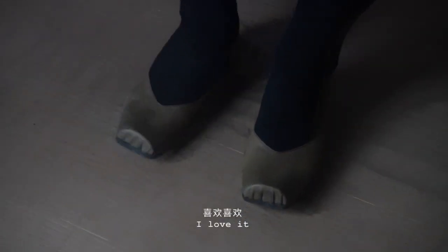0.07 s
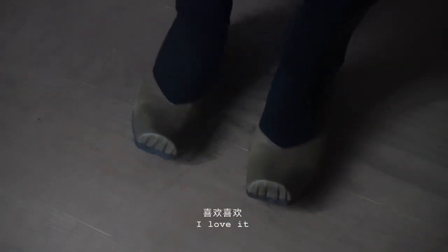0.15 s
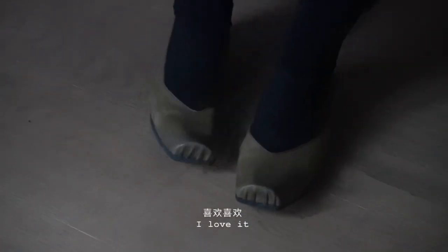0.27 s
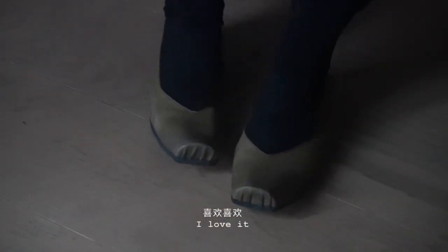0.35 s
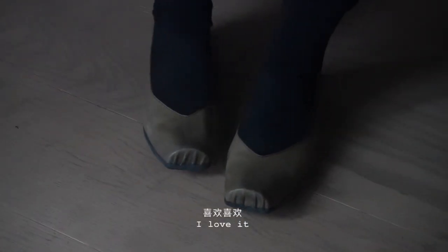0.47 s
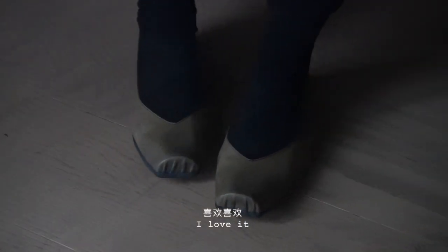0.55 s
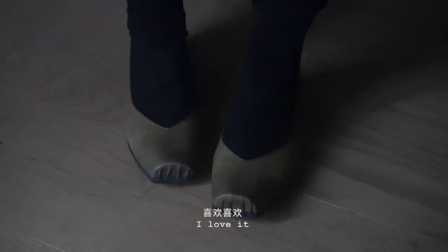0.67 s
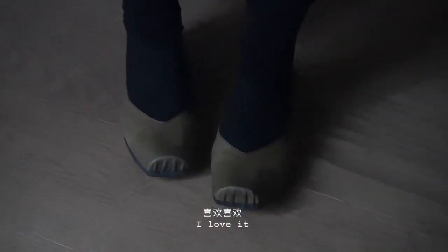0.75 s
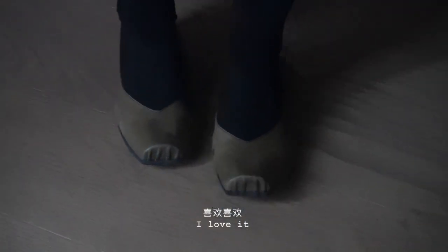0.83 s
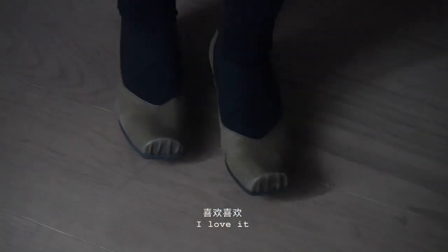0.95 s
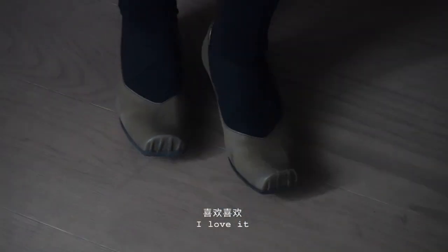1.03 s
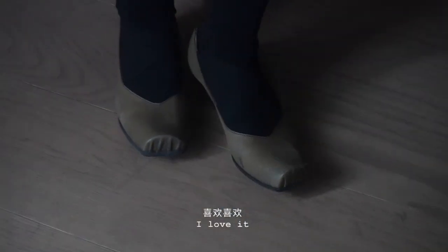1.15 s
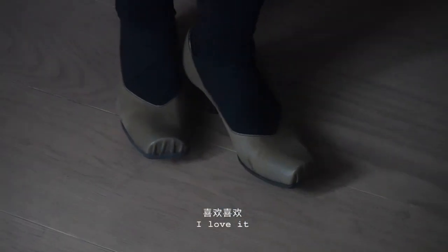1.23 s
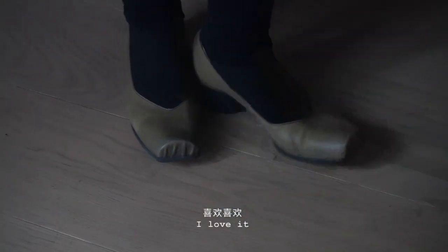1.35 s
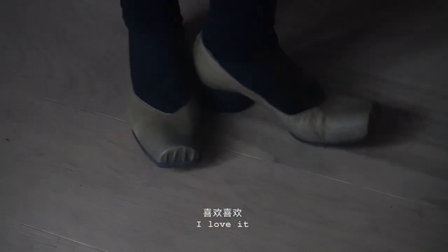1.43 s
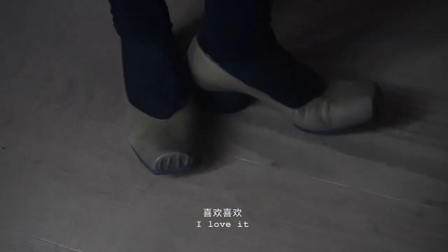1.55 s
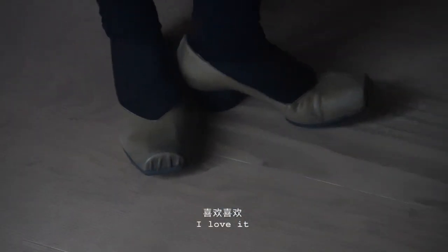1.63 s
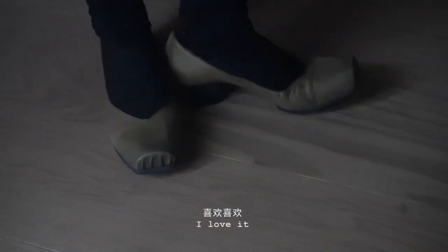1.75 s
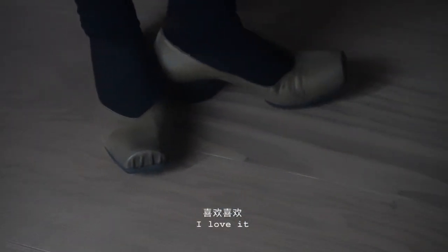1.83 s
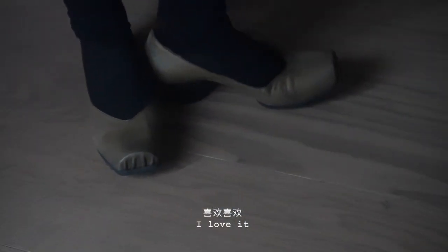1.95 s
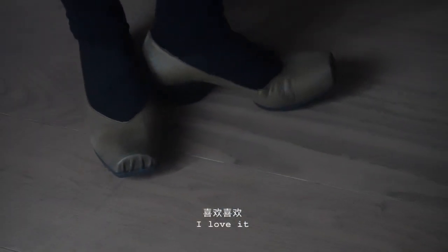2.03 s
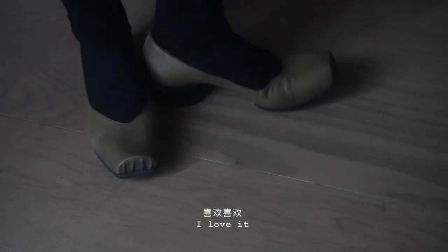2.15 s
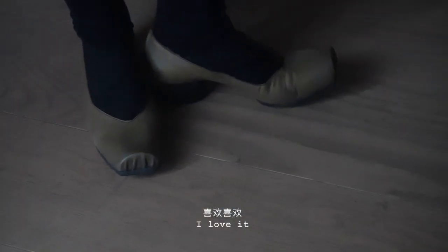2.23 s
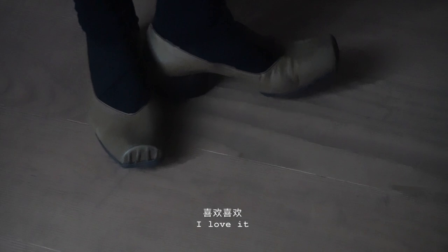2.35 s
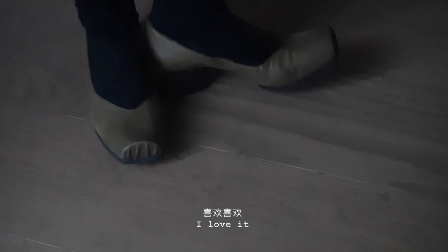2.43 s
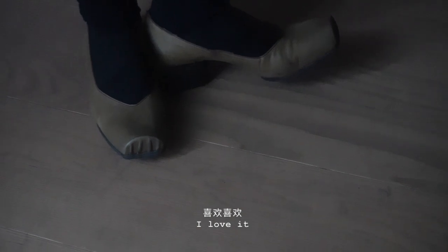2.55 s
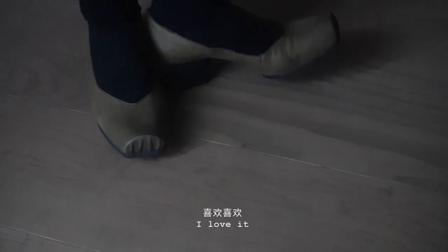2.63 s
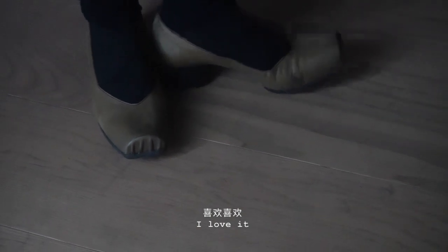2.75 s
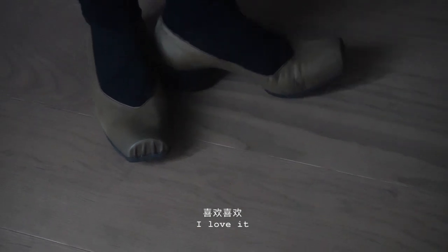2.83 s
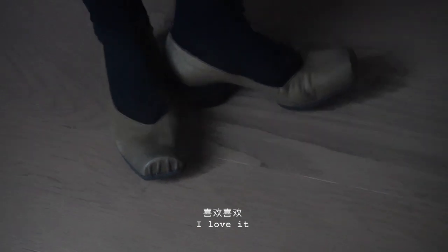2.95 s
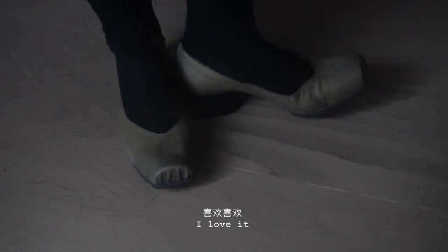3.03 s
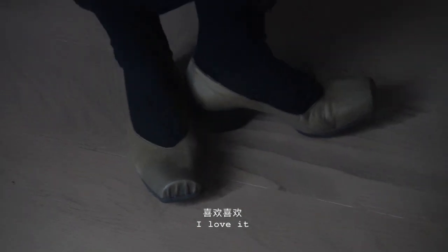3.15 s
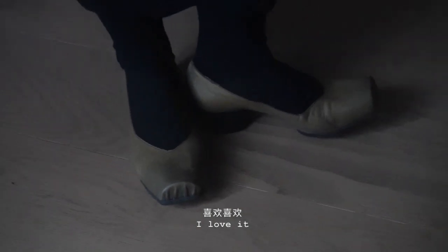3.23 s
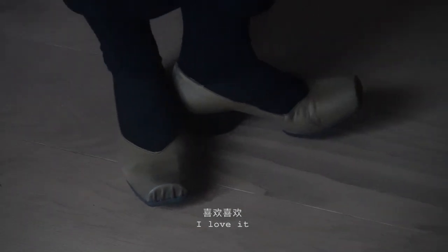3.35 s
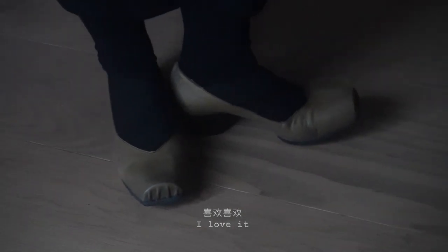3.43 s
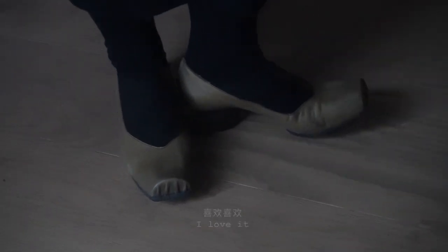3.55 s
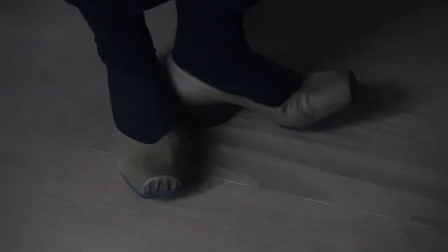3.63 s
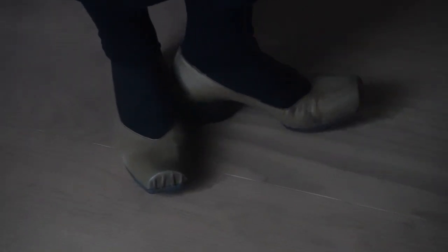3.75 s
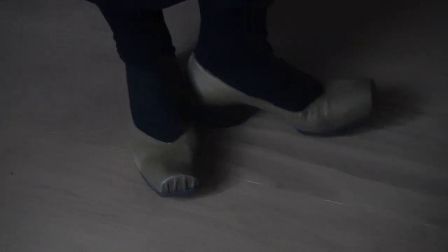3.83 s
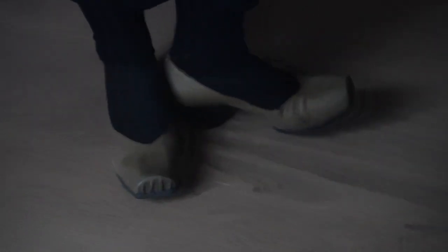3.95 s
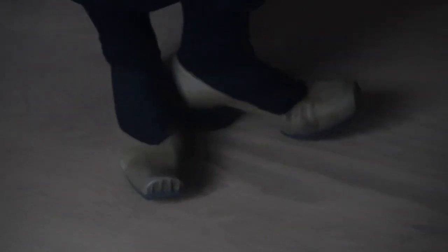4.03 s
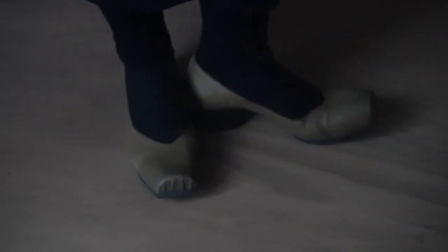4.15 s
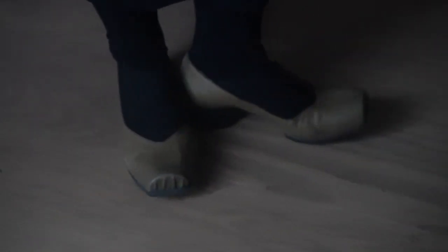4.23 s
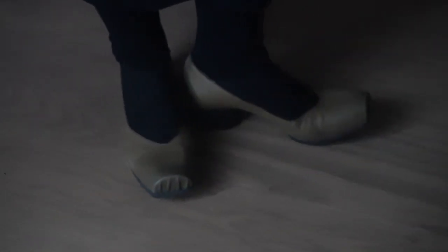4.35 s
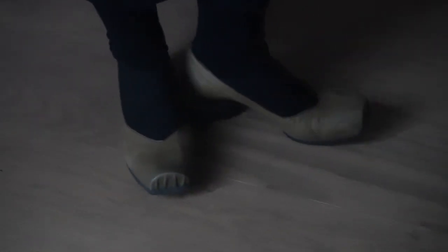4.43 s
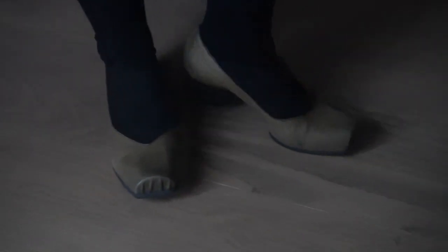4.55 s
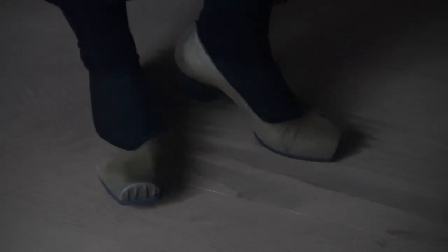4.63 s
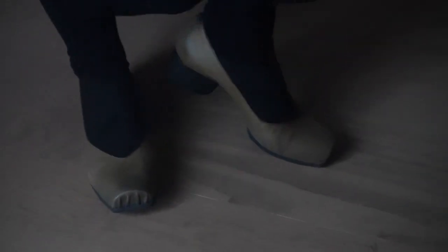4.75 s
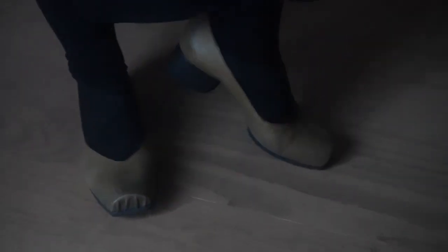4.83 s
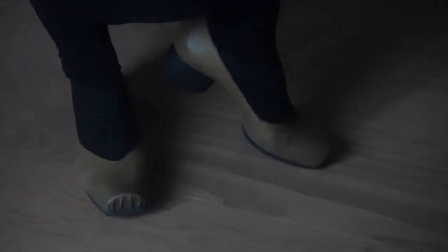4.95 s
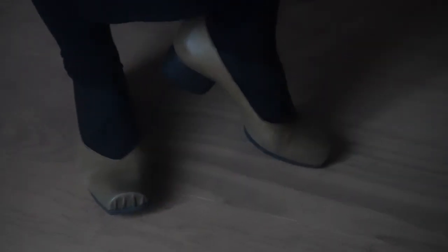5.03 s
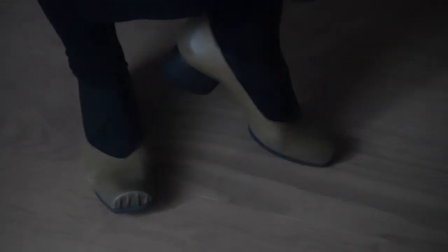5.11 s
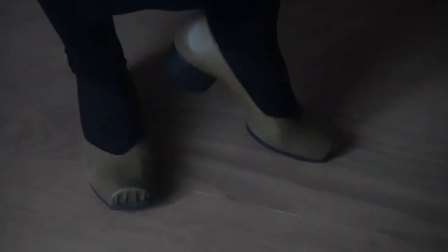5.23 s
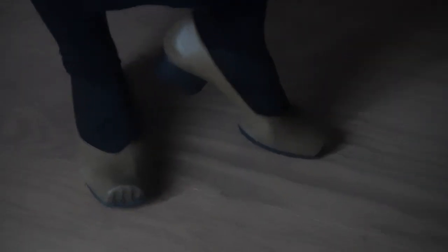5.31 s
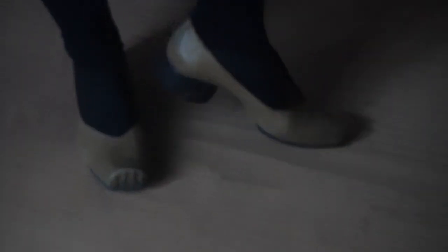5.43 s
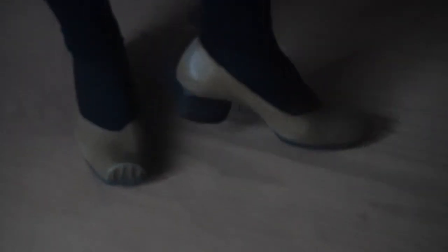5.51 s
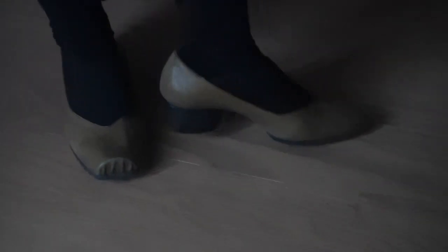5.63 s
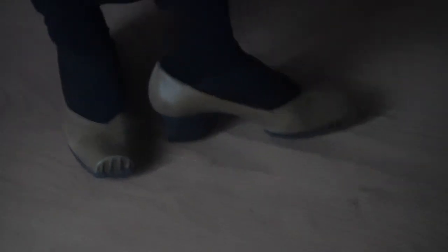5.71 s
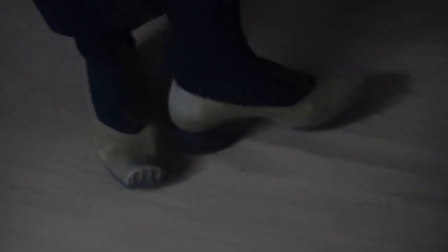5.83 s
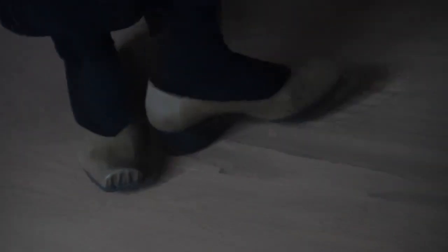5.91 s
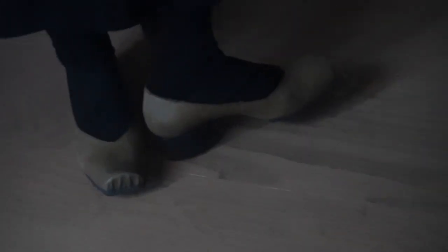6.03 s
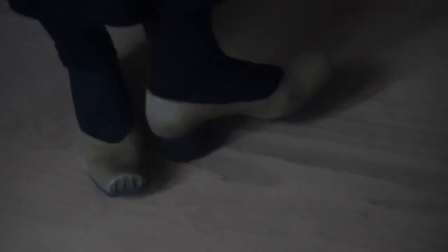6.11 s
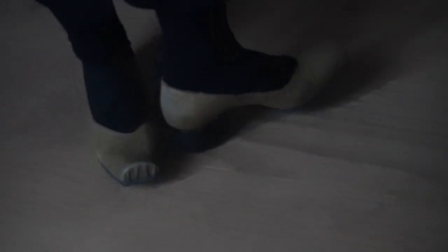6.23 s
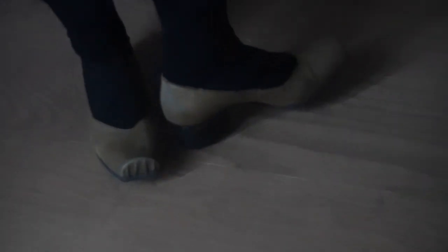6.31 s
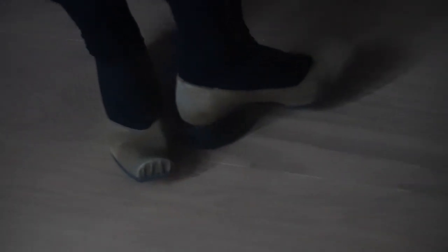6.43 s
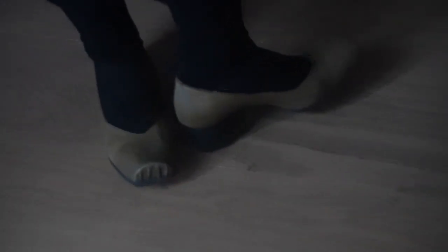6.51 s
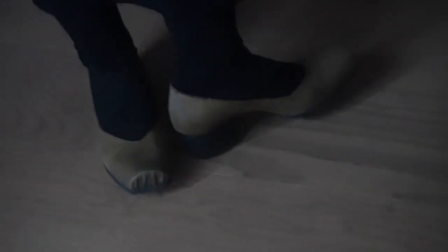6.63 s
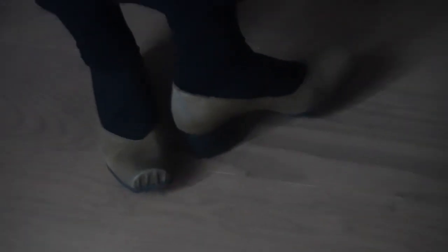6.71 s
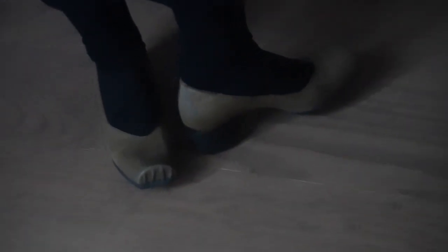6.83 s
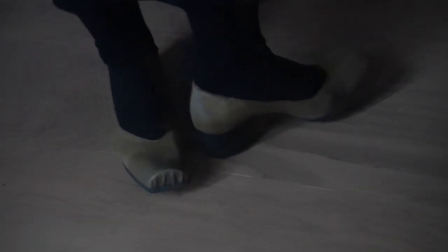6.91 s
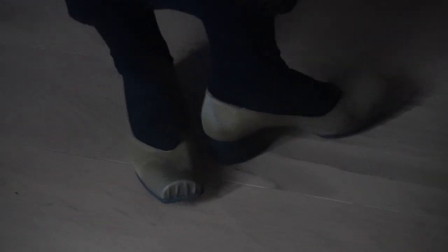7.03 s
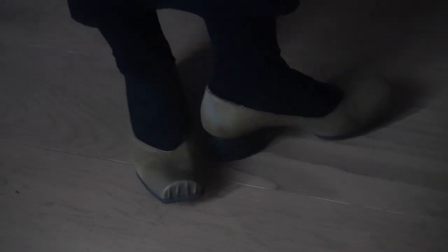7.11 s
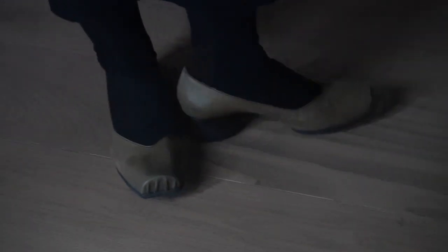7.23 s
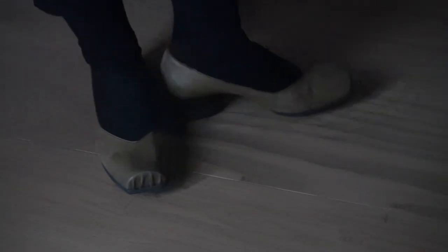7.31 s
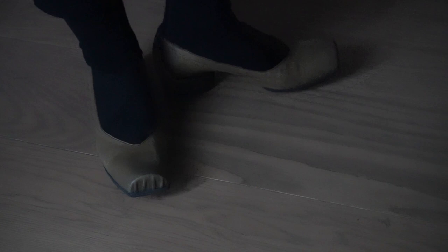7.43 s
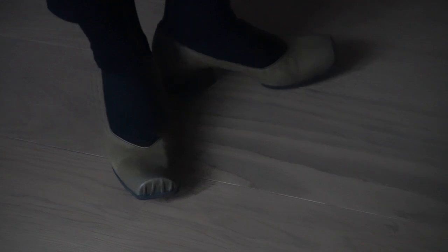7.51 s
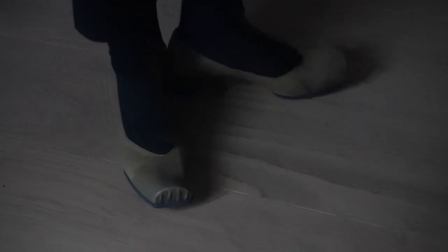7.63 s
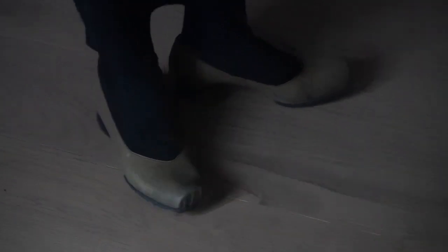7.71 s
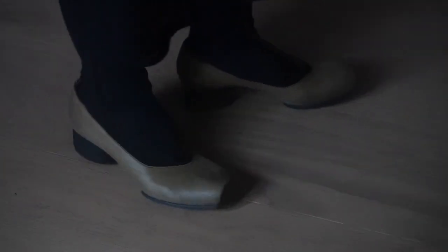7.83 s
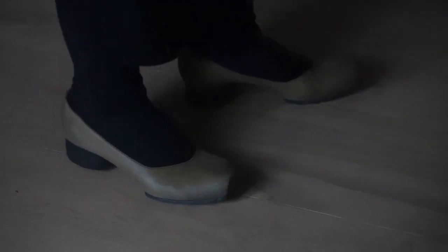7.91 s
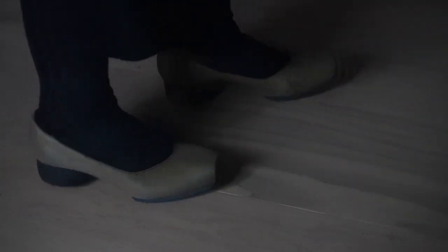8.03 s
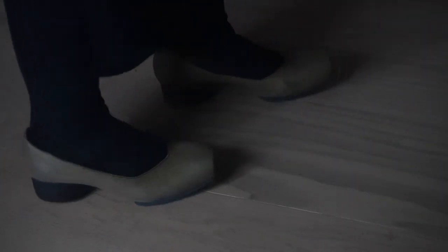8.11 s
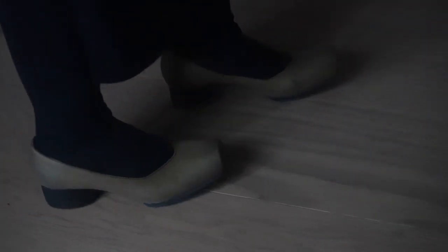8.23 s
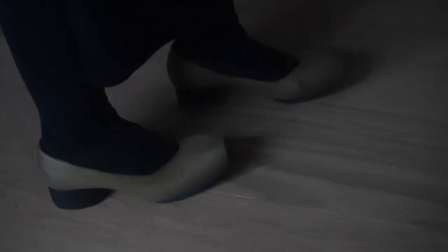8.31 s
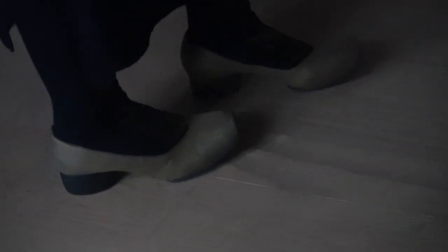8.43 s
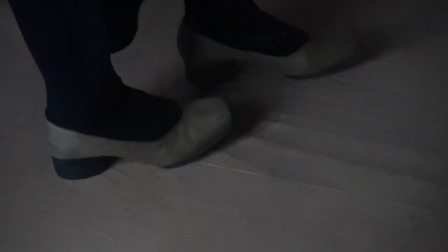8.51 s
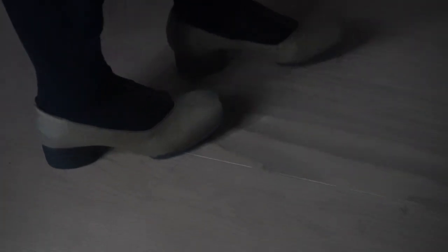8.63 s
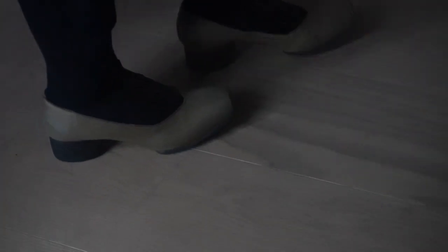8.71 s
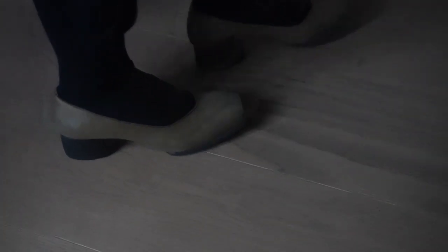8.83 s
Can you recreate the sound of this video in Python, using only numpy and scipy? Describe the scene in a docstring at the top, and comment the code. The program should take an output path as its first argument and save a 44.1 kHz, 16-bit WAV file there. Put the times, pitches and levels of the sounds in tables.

```python
"""Low-heeled shoes on a wooden floor in a small quiet room, heard close by a pair of microphone ports.
A low rumble and a hiss, both shaped noise, run throughout. First the soles slide: noise rings and hisses in strokes,
with one flat knock near 0.2 s and a squeaking tone at 1.4 s. Five toe knocks follow from 2.8 to 4.1 s, then more
sliding, a faint squeak, and a heel knock at 5.8 s. From 7 s knocks, their noisy tails and slides mix; two faint
squeaks lead to a loud flat knock at 8.2 s. Knocks are pushes that ring shoe and boards; a noise tail is the room."""
import sys
import numpy as np
from scipy import signal
from scipy.fft import rfft, irfft
from scipy.io import wavfile

SR = 44100
rng = np.random.default_rng(int(sys.argv[2]) if len(sys.argv) > 2 else 0)


def to_wav(sig):
    """Store sig (one row per channel, or 1-D mono) as 16-bit WAV at the path in sys.argv[1].

    Samples outside -1..1 are clipped; the rate is SR.
    """
    pcm = np.clip(np.atleast_2d(sig), -1, 1) * 32767
    pcm = np.round(pcm).astype(np.int16)
    wavfile.write(sys.argv[1], SR, pcm.T)  # frames by channels


def to_linear_factor(level_db):
    """Convert decibel levels (scalar or array-like) to linear amplitude factors."""
    exponent = np.asarray(level_db, float) / 20
    return 10 ** exponent


N = 390726   # length in samples


def rms_one(x):
    """Scales to unit rms."""
    return x / np.sqrt(np.mean(x ** 2) + 1e-20)


def at_hz(points, hz):
    """Reads a table of (Hz, value) between its points, on a log-frequency axis."""
    table_hz, value = np.array(points).T
    return np.interp(np.log(hz), np.log(table_hz), value)


def coloured(spectrum, size):
    """White noise shaped by a spectrum, scaled to rms 1."""
    hz = np.maximum(np.arange(size[-1] // 2 + 1) * SR / size[-1], 1)
    white = rfft(rng.standard_normal(size))
    return rms_one(irfft(white * to_linear_factor(at_hz(spectrum, hz)), size[-1]))


def drift(rate):
    """Random wandering, smoothed above the given rate in Hz, with spread 1."""
    r = np.exp(-2 * np.pi * rate / SR)
    wander = signal.lfilter([1], [1, -2 * r, r * r], rng.standard_normal(N + SR))
    return rms_one(wander[SR:])   # the first second lets the filter settle


def ring(force, hz, t60):
    """A resonance: a unit click sets a sine of height 1 ringing, which falls 60 dB in t60 seconds."""
    r, w = to_linear_factor(-60 / (t60 * SR)), 2 * np.pi * hz / SR
    return signal.lfilter([0, np.sin(w)], [1, -2 * r * np.cos(w), r * r], force + 1e-18)


def left_right(mid, side):
    """Two channels from their sum (mid) and difference (side)."""
    return np.array([mid + side, mid - side])


# Colour of the quiet room. Each row: pitch in Hz, relative level in dB per Hz.
QUIET_SPECTRUM = [(12, -66), (20, -45.5), (38, -0.5), (104, -1.5), (172, -10.5), (301, -16.5), (337, -13),
                  (472, -20), (542, -20.5), (1150, -27), (1330, -29), (2670, -31.5), (3530, -34),
                  (12100, -39.5), (16000, -40.5)]
# How its side signal is coloured. Each row: pitch in Hz, side against mid in dB before the overall side level.
QUIET_SIDE = [(60, -52), (110, -23), (200, -7), (380, -6.5), (700, 3.5), (1290, 1.5), (2380, 1),
              (4400, -0.5), (8120, 1), (15000, -2)]


def quiet_room():
    """Rumble through the walls, nearly alike at both ports, and microphone hiss, all as shaped noise."""
    side_spectrum = [(hz, db + at_hz(QUIET_SIDE, hz)) for hz, db in QUIET_SPECTRUM]
    mid = coloured(QUIET_SPECTRUM, size=(N,))
    side = to_linear_factor(-10) * coloured(side_spectrum, size=(N,))
    return to_linear_factor(-50.5) * left_right(mid, side)


def strokes(rows, weight):
    """Strokes swell and fade on a rounded curve and add in power; the last column times weight colours each one."""
    s, rise, fall, db, colour = np.transpose(rows)[:, :, None]
    t = np.arange(0, N + 64, 64) / SR   # worked out every 64 samples
    away = np.abs(t - s) / np.maximum(np.where(t < s, rise, fall), .003)
    level_db = db + weight * colour - 20 * np.minimum(away, 4) ** 1.68   # the power makes it rounded
    power = to_linear_factor(2 * level_db).sum(axis=0)
    return np.interp(np.arange(N) / SR, t, np.sqrt(power))


# What the noisy swells ring with. Each row: pitch in Hz, width in Hz, relative level in dB.
SWELL_RINGS = [(348, 16, -15), (495, 310, -9.5), (795, 920, -0.5), (1110, 130, -7), (1580, 1100, -5.5),
               (1730, 170, -2), (2300, 540, -4), (2850, 250, -11.5), (3265, 550, -5.5), (3840, 290, -31),
               (4430, 220, -16.5), (5970, 250, -20.5)]
# The grain of the floor hisses in bands. Each row: pitch in Hz, relative level in dB per Hz.
GRAIN_HISS = [(2350, -8), (4000, -2.5), (4750, -7), (5190, -1.5), (5630, -5), (6030, -4.5), (6410, -3.5),
              (6760, -4), (7270, -4), (10000, -5.5), (13000, -40), (22000, -120)]
# The finest, highest hiss. Each row: pitch in Hz, relative level in dB per Hz.
FINEST_HISS = [(5880, -43), (10000, 1), (11300, 5), (13200, 3), (14800, 4), (16500, -1.5)]
# Noisy, ringing swells: sole rubs, and at 5.82, 7.04, 7.57 and 8.3 s the dying tails of knocks. Each row:
# loudest moment in seconds, rise and fall in seconds (to 20 dB down), relative level in dB,
# brightness in dB per octave around 2000 Hz.
RINGING_SWELLS = [(.04, 0.12, .1, -39.5, 2.5), (.28, 0.13, .12, -37.5, 4.5), (.42, .1, 0.33, -62.5, -1),
                  (.87, 0.14, 0.11, -45.5, -0.8), (1.0, 0.19, 0.21, -43.5, 0.2),
                  (1.16, 0.083, 0.087, -39, 1.5), (1.25, 0.098, 0.087, -42.5, -0.5),
                  (1.42, 0.17, .15, -34, 2.5), (1.55, 0.22, 0.21, -59.5, -8.5),
                  (1.77, 0.19, 0.16, -50.5, -1.2), (4.47, 0.073, 0.065, -41, 1),
                  (5.51, 0.13, 0.15, -43.5, 6.5), (5.82, 0.068, 0.083, -43, -4),
                  (6.13, 0.24, 0.21, -55, -3), (7.04, 0.073, 0.11, -48.5, -2), (7.28, 0.22, 0.15, -42, 5.5),
                  (7.37, 0.099, 0.058, -41, 5), (7.46, 0.031, 0.1, -36, 5),
                  (7.57, 0.06, 0.039, -47.5, -8.5), (7.755, 0.097, .08, -37.5, 1.5),
                  (7.85, .08, 0.52, -56.5, 3), (8.16, 0.18, 0.097, -53, -0.5), (8.3, 0.13, 0.18, -44.5, -7),
                  (8.43, 0.049, 0.13, -51, 1.5), (8.59, 0.021, 0.036, -54, -3)]
# Hissing swishes over the grain. Each row: loudest moment in seconds, rise and fall in seconds (to 20 dB down),
# relative level in dB, finest hiss in dB relative to that.
SWISH_STROKES = [(.045, 0.073, 0.07, -46.5, -7.5), (.28, 0.11, 0.093, -46, -5), (.42, .1, .25, -62.5, -6),
                 (.9, 0.18, 0.37, -56, -3), (1.03, 0.19, 0.1, -62, -4), (1.24, 0.27, 0.04, -54, -1),
                 (1.41, 0.16, 0.12, -49.5, 0), (1.53, .08, 0.17, -62.5, 0), (1.79, 0.25, 0.17, -62.5, 0.1),
                 (4.47, 0.062, 0.036, -53, -3), (4.66, 0.16, .25, -61, 0.1), (4.88, .2, 0.24, -65.5, 3),
                 (5.49, 0.08, 0.091, -48, -2), (5.8, 0.032, 0.081, -64, -5), (7.05, 0.086, 0.048, -52, 0),
                 (7.26, 0.19, 0.066, -46, 4), (7.34, 0.054, 0.078, -51.5, -3), (7.455, .02, 0.046, -43, 1),
                 (7.56, 0.064, 0.099, -58.5, -3), (7.755, 0.086, 0.044, -46.5, -2),
                 (7.85, 0.19, 0.16, -58.5, -3.5), (8.14, 0.45, .06, -62.5, -3), (8.4, 0.22, 0.12, -57, -4)]


def slides():
    """Noise rings and hisses in swells, for sliding soles and some knocks' tails; returns near sound and room feed."""
    ringing_pan_db, swish_pan_db = -1.5, -0.5   # left against right
    # the random exponent makes some grains of noise far stronger than others
    strength = to_linear_factor(3.0 * np.minimum(rng.exponential(1, N), 4))
    grains = rng.standard_normal((len(SWELL_RINGS), N)) * strength
    ringing = 0
    for grain, (hz, width_hz, db) in zip(grains, SWELL_RINGS):
        t60 = np.log(1000) / (np.pi * width_hz)   # a wide resonance dies fast
        rung = rms_one(ring(grain, hz, t60))
        flicker_db = 3.42 * drift(10.7) + 1.7 * drift(79)
        ringing = ringing + rung * strokes(RINGING_SWELLS, np.log2(hz / 2000)) * to_linear_factor(db - 9 + flicker_db)
    no_bass = signal.butter(2, 300, "high", fs=SR, output="sos")
    ringing = signal.sosfilt(no_bass, ringing)

    hiss = coloured(GRAIN_HISS, size=(2, N)) * strokes(SWISH_STROKES, 0) * to_linear_factor(1.9 * drift(40))
    hiss += coloured(FINEST_HISS, size=(2, N)) * strokes(SWISH_STROKES, 1) * to_linear_factor(0.7 * drift(60))

    near = ringing * to_linear_factor([[ringing_pan_db / 2], [-ringing_pan_db / 2]])
    swish = left_right(hiss[0], .5 * hiss[1])
    near += swish * to_linear_factor([[swish_pan_db / 2], [-swish_pan_db / 2]])
    return near, ringing + hiss[0]


# How long the room rings. Each row: pitch in Hz, time to fall 60 dB in seconds.
TAIL_T60 = [(100, 1), (300, 0.41), (1000, 0.6), (2500, 0.45), (6000, 0.39), (15000, 0.54)]
# How wide the tail is. Each row: pitch in Hz, side against mid in dB.
TAIL_WIDTH = [(100, -35), (400, -15), (1000, -6.5), (2000, -3), (5000, 4), (15000, -5)]
# Colour of the tail before it fades. Each row: pitch in Hz, relative level in dB.
TAIL_COLOUR = [(200, 1), (600, -2.1), (1500, -0.5), (2500, 3.5), (4000, 0), (9000, -1)]


def room(x):
    """A diffuse tail: half-octave bands of noise, each dying at its own rate and with its own width."""
    t = np.arange(SR // 2) / SR
    edges = 60 * 2 ** np.arange(0, 8.6, .5)
    tail = 0
    for low, high in zip(edges, np.minimum(edges[1:], .45 * SR)):
        hz = np.sqrt(low * high)
        band = signal.butter(2, [low, high], "band", fs=SR, output="sos")
        mid, side = signal.sosfilt(band, rng.standard_normal((2, len(t))))
        fade = to_linear_factor(at_hz(TAIL_COLOUR, hz) - 60 * t / at_hz(TAIL_T60, hz))
        tail = tail + fade * left_right(mid, side * to_linear_factor(at_hz(TAIL_WIDTH, hz)))
    tail = tail * (1 - np.exp(-t / 0.001))   # it builds up over a few milliseconds
    return signal.fftconvolve(x[None], tail)[:, :N]


# The knocks. Each row: start in seconds, part of the shoe, peak of the shoe's own sound in dB,
# rough contact time in milliseconds, gritty crack in dB relative to the peak (before its filter).
KNOCK_LIST = [(.187, "flat", -17, 0.8, -30), (2.808, "toe", -17, 0.41, -24),
              (3.128, "toe", -10.5, 0.33, -30), (3.4515, "toe", -10, 0.35, -36),
              (3.788, "toe", -8, 0.25, -40), (4.114, "toe", -9.5, 0.33, -29.5),
              (5.78, "heel", -8, 0.96, -12), (6.991, "flat", -18, 0.2, -23), (7.438, "heel", -36, 1.3, 4),
              (7.551, "flat", -23.5, 0.4, -30), (8.204, "flat", -6.5, 0.35, -25)]
# What each part of the shoe rings with when struck. Each row: pitch in Hz, relative level in dB (before
# a small random change at each blow), time to fall 60 dB in seconds.
SHOE_RINGS = {"toe": [(330, -18, 0.085), (502, 5, 0.0076), (785, 1, 0.012), (1130, -0.5, 0.009),
              (1640, 3, 0.0085), (2090, -9.5, 0.0054), (2830, -14.5, 0.0051)], "heel": [(255, 3, 0.015),
              (354, -8, 0.068), (498, 5, 0.017), (608, -6.5, 0.015), (1200, 1, 0.0076), (1695, 0, 0.048),
              (3570, 10, 0.02)], "flat": [(330, -13, 0.01), (538, 0, 0.0087), (675, -0.5, 0.012),
              (1100, -10, 0.012), (1670, -5.5, 0.0063), (2220, -10, 0.0064), (4500, -13, .01)]}
# The pitches in Hz at which the boards and air of the room ring.
BOARD_PITCHES = [252, 335, 372, 467, 535, 605, 642, 737, 795, 906, 1000, 1037, 1134, 1336]
# How they ring, in the same order. Each row: relative level in dB, time to fall 60 dB in seconds.
BOARD_RINGS = [(-15.5, 0.55), (3.5, 0.28), (-1.5, 0.36), (-9, 0.2), (-0.5, .35), (-20.5, 0.32), (1.5, 0.28),
               (2.5, 0.16), (7.5, 0.14), (3.5, 0.34), (1.5, 0.48), (-4, 0.24), (-9, .35), (1, 0.16)]
# First echoes from nearby walls and furniture. Each row: delay in seconds, relative level in dB.
FIRST_ECHOES = [(.0035, -18), (.0098, -6.5), (0.027, -13.5)]
# How each part loads the floor. Each row: thump in dB for a full-scale blow, share of the blow's dB that the
# thump follows, ringing of boards and room in dB, first echoes in dB relative to that.
FLOOR_LOAD = {"toe": (-23, 0.64, -2.5, 0.5), "heel": (-21, 1.5, -7, -6.5), "flat": (-29, 1, -0.5, -5.5)}


def knocks():
    """A short push rings the shoe, which rings boards and room; returns near sound and room feed."""
    thump_hz, thump_t60_s, crack_t60_s = 88.6, 0.18, 0.013
    near, sent = np.zeros((2, N + SR)), np.zeros(N + SR)
    t = np.arange(SR) / SR
    after = np.maximum(t - .0015, 0)   # the push comes 1.5 ms after the start
    crack_time = after[:4096]
    gritty = signal.butter(1, [1500, 9000], "band", fs=SR, output="sos")
    small = signal.butter(4, 270, "high", fs=SR, output="sos")   # a shoe is too small to radiate bass
    snap = signal.sosfilt(gritty, np.arange(4096) == 70)   # the room hears the crack as one snap

    for s, part, peak_db, contact_ms, crack_db in KNOCK_LIST:
        thump_db, follows, ringing_db, echo_db = FLOOR_LOAD[part]
        push = -after ** 2 * np.exp(-after / (max(contact_ms, .05) / 5000))   # longer contact is duller
        push /= -push.sum()

        shoe = sum(to_linear_factor(db + rng.normal(0, 1.9)) * ring(push, hz, t60) for hz, db, t60 in SHOE_RINGS[part])
        shoe = signal.sosfilt(small, shoe)
        shoe /= np.abs(shoe).max()

        # every blow lands on the boards a little differently
        struck = to_linear_factor(2 * rng.standard_normal(len(BOARD_RINGS)))
        boards = np.zeros(SR)
        for k, (hz, (db, t60)) in enumerate(zip(BOARD_PITCHES, BOARD_RINGS)):
            boards += (-1) ** k * struck[k] * to_linear_factor(db) * ring(shoe, hz, t60)

        echoes = sum(to_linear_factor(db) * np.roll(shoe, int(lag * SR)) for lag, db in FIRST_ECHOES)
        echoes = signal.lfilter([.3], [1, -.7], echoes)   # soft surfaces return a duller knock

        thump = ring(push, thump_hz, thump_t60_s)
        thump *= 1 - np.exp(-t / 0.00096)   # the floor swings in slowly

        blow = shoe + to_linear_factor(ringing_db) * (to_linear_factor(echo_db) * echoes + to_linear_factor(-52) * boards)
        blow += to_linear_factor(thump_db + (follows - 1) * peak_db) * thump

        crack_shape = to_linear_factor(crack_db - 60 * crack_time / crack_t60_s) * np.minimum(crack_time / 0.00046, 1)
        crack = signal.sosfilt(gritty, rng.standard_normal((2, 4096)) * crack_shape)

        i = round(s * SR)
        near[:, i:i + SR] += to_linear_factor(peak_db) * blow
        near[:, i:i + 4096] += to_linear_factor(peak_db) * left_right(crack[0], 0.68 * crack[1])
        sent[i:i + SR] += to_linear_factor(peak_db + ringing_db - 21) * shoe
        sent[i:i + 4096] += to_linear_factor(peak_db + crack_db - 8) * snap
    return near[:, :N], sent[:N]


# The sole catches and squeaks. Each row: start in seconds, peak in dB, starting pitch in Hz, length in seconds.
SQUEAK_LIST = [(1.445, -36.5, 495, 0.028), (5.355, -47.5, 330, 0.04), (8.12, -57, 3100, .05),
               (8.18, -54, 2300, 0.014)]


def squeaks():
    """A brief regular stick-slip: a tone that swells, fades and falls slightly in pitch."""
    out = np.zeros(N)
    for s, peak_db, hz, length in SQUEAK_LIST:
        u = np.linspace(0, 1, int(length * SR))   # 0 to 1 along the squeak
        cycles = hz * length * (u - 0.018 * u * u)
        i = round(s * SR)
        out[i:i + len(u)] += to_linear_factor(peak_db) * np.sin(np.pi * u) * np.sin(2 * np.pi * cycles)
    return out


def scene():
    """Adds the near sounds, their tails in the room and the quiet room itself."""
    quiet = quiet_room()
    slide, slide_sent = slides()
    knock, knock_sent = knocks()
    squeak = squeaks()
    tails = room(to_linear_factor(-12.5) * knock_sent + to_linear_factor(-38) * (slide_sent + squeak))
    return knock + slide + squeak + tails + quiet


def band_limit(x):
    """A steep low-pass at the top of the band."""
    return signal.sosfilt(signal.butter(12, 15780, fs=SR, output="sos"), x)


def record(dry):
    """Turns the finished mix into the sound that is kept."""
    return band_limit(dry)


dry = scene()
out = record(dry)
to_wav(out)
```